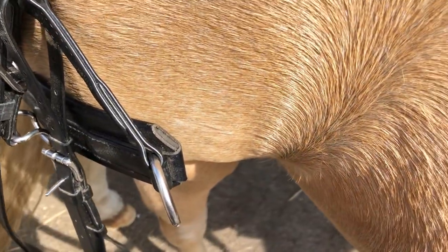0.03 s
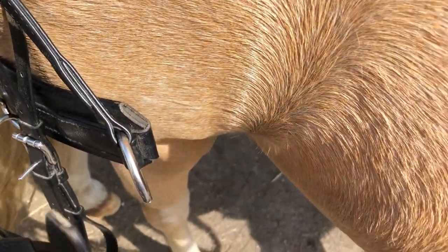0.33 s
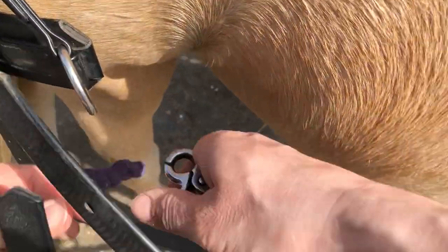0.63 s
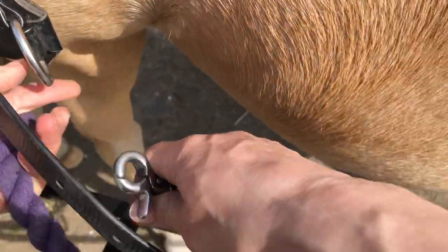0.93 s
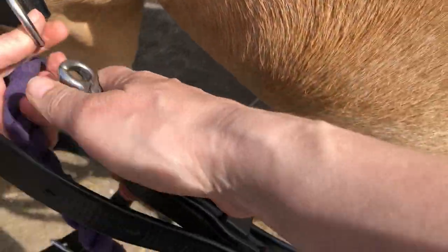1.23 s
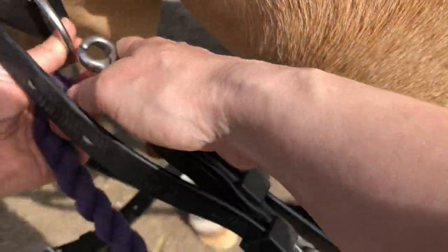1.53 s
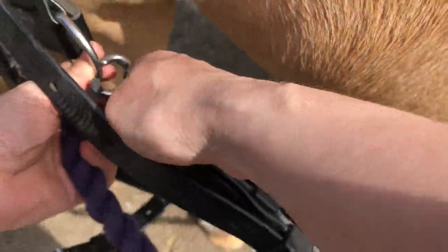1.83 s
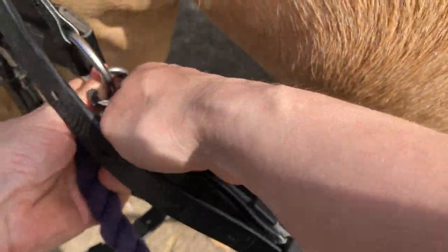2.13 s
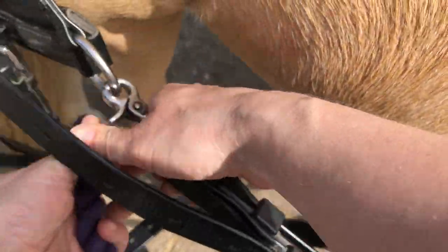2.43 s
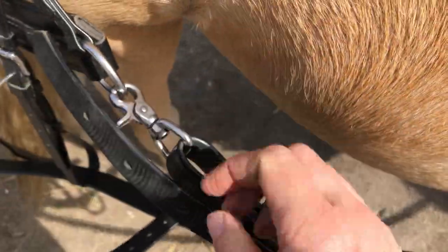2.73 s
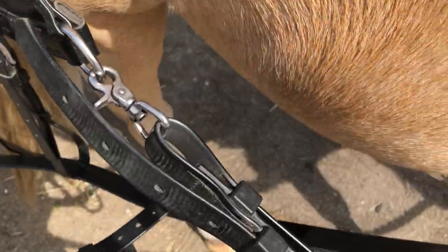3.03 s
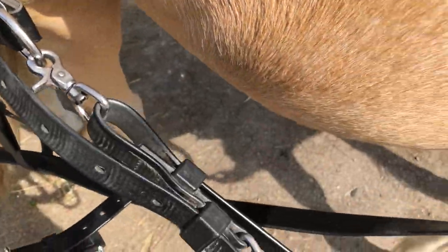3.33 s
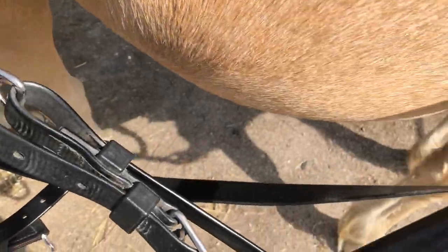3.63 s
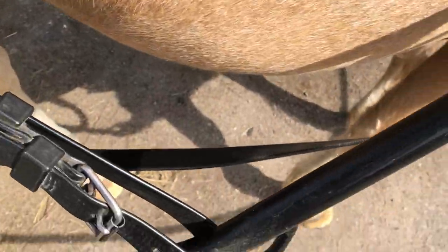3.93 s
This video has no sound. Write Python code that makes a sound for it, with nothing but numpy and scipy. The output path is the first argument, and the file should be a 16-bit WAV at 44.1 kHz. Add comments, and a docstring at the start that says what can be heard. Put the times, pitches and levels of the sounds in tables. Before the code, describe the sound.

Metal clicks of a hook being fastened to a harness, with rubbing, leather creak and birds.

```python
"""A snap hook is clipped to a harness ring beside a horse, outdoors, close to the microphone.
From the start, hands rub and bump the camera, a strap hisses and far birds chirp over a faint rumble.
The hook clicks, a nearer bird whistles, the ring jingles, and near 1 s grit scuffs once on the ground.
Then the tight leather strap creaks, slowing from a squeak to ticks. The bird whistles again,
the hook snaps sharply at 2.3 s, and a few small clicks, soft bumps and chirps end the scene."""
import sys
import numpy as np
from scipy import signal
from scipy.fft import rfft, irfft
from scipy.io import wavfile
from scipy.ndimage import uniform_filter1d

SR = 44100
rng = np.random.default_rng(int(sys.argv[2]) if len(sys.argv) > 2 else 0)


def dump_mix(stems):
    """Bounce the given channels to the path in sys.argv[1] as a 16-bit WAV at rate SR."""
    frames = np.atleast_2d(stems).T  # one column per channel
    limited = np.clip(frames, -1, 1)  # hard clip at full scale
    pcm = np.round(limited * 32767).astype(np.int16)
    wavfile.write(sys.argv[1], SR, pcm)


N = 176400
T = np.arange(N) / SR
YARD_T60 = 0.055  # a t60 is a fade time: the seconds a sound takes to drop by 60 dB


def amp(db):
    """Turns decibels into a gain to multiply by."""
    return 10 ** (np.asarray(db) / 20)


def unit(x):
    """Scales a signal to an average power of 1."""
    return x / np.sqrt(np.mean(x ** 2) + 1e-20)


def read(colour, hz):
    """Looks up the level at hz in a colour: a list of (frequency in Hz, level in dB) points."""
    freqs, db = np.transpose(colour)
    return np.interp(np.log(hz + 1), np.log(freqs + 1), db)


def add(mix, start, sound):
    """Mixes a sound in at a start time in seconds."""
    part = mix[max(round(start * SR), 0):][:len(sound)]
    part += sound[:len(part)]


def noise(colour):
    """Steady noise with the given colour."""
    gains = amp(read(colour, np.fft.rfftfreq(N, 1 / SR)))
    return unit(irfft(rfft(rng.standard_normal(N)) * gains, N))


def impulse(colour, size=2048):
    """One sharp pulse with the given colour; it also serves as a filter."""
    log_gain = np.log(amp(read(colour, abs(np.fft.fftfreq(size, 1 / SR)))))
    spectrum = np.exp(signal.hilbert(log_gain).conj())  # packs the energy at the start
    return np.fft.ifft(spectrum).real[:size // 2]


def echo(x, t60):
    """Sound bounces around the yard and comes back as a fading blur."""
    t = T[:SR // 2]
    tail = rng.standard_normal(len(t)) * amp(-60 * t / t60) * (t > .003)
    return signal.fftconvolve(x, tail / np.linalg.norm(tail))[:N]


def mode(hz, db, t60, size=16000):
    """One fading tone of a struck object."""
    t = T[:size]
    return amp(db - 60 * t / max(t60, .001)) * np.sin(2 * np.pi * (hz * t + rng.random()))


def rumble():
    """The faint, steady rumble of the outdoors."""
    # Each row: frequency in Hz, relative level in dB.
    colour = [(15, -65), (25, -58), (184, -39.5), (211, 0.5), (299, -6), (342, -5), (437, -7.5),
              (812, -5.5), (881, -5.5), (1040, -9), (1510, -12), (1780, -13), (2330, -19), (4450, -23),
              (15800, -38)]
    return amp(-60) * noise(colour)


def rubbing():
    """A hand rubs on the camera and makes a dull noise."""
    # Each row: time in seconds, level in dB.
    levels = [(0, -33.5), (.18, -37), (.33, -44.5), (.38, -47.5), (.55, -48.5), (.9, -54.5), (1.05, -41.5),
              (1.2, -51.5), (1.32, -53.5), (1.55, -52), (1.85, -57), (2.3, -59.5), (2.48, -54),
              (2.68, -49.5), (2.95, -57.5), (3.62, -65.5), (3.74, -49), (4, -60.5)]
    # Each row: frequency in Hz, relative level in dB.
    colour = [(20, -39), (50, 6.5), (90, 2.5), (180, -2), (350, -11.5), (650, -21), (1100, -33),
              (3000, -54), (16000, -82)]
    return noise(colour) * amp(np.interp(T, *np.transpose(levels)))


def sliding():
    """The strap slides through the hand with a grainy hiss."""
    # Each row: time in seconds, level in dB.
    levels = [(0, -65), (.3, -66), (.5, -66.5), (.72, -60), (.85, -63.5), (1.15, -61.5), (1.3, -64.5),
              (1.75, -68), (2.3, -68.5), (2.6, -64), (2.7, -64.5), (2.79, -59.5), (2.88, -65.5),
              (2.95, -73.5), (3.12, -69), (3.22, -68.5), (3.29, -70), (3.37, -66.5), (3.47, -74.5),
              (3.88, -81), (3.93, -69), (4, -71)]
    # Each row: frequency in Hz, relative level in dB.
    colour = [(100, -26), (1500, 7.5), (3000, 0), (8000, -4.5), (12000, -6), (16000, -9)]
    grain = amp(2.8 * unit(uniform_filter1d(rng.standard_normal(N), size=130)))
    return grain * noise(colour) * amp(np.interp(T, *np.transpose(levels)))


def song(notes, echo_db):
    """A bird sings raspy, gliding notes, blurred by a fluttering echo."""
    out = np.zeros(N)
    flutter = noise([(20, 0), (539, 0), (1078, -20), (5000, -70)])
    scatter = unit(1 + amp(-3.5) * np.roll(flutter, N // 2))
    warble = .015 * unit(uniform_filter1d(rng.standard_normal(N), size=120))
    for start, length, start_hz, end_hz, db in notes:
        on = (T >= start) & (T < start + length)
        progress = (T[on] - start) / length
        hz = (start_hz + (end_hz - start_hz) * progress) * (1 + warble[on])
        swell = amp(db - 2.3) * np.sqrt(abs(np.sin(np.pi * progress)))
        rasp = 1 + amp(-9) * flutter[on]
        out[on] += swell * rasp * np.sin(2 * np.pi * np.cumsum(hz) / SR)
    return out + amp(echo_db) * echo(out, t60=.49) * scatter


def birds():
    """A far bird chirps; a nearer one, with less echo, gives two falling whistles."""
    # Each row: start and length in seconds, first and last pitch in Hz, relative level in dB.
    chirps = [(0, .05, 4600, 4850, -53), (.012, .043, 2550, 3800, -56), (.051, .007, 4500, 3600, -42.5),
              (.058, .018, 3400, 2600, -46), (1.164, .02, 3400, 4150, -54), (1.173, .013, 4350, 4320, -48),
              (1.19, .012, 3950, 3820, -49), (1.198, .01, 4800, 4350, -48), (1.207, .018, 2850, 3380, -51),
              (1.72, .024, 4380, 4080, -48.5), (1.746, .011, 4300, 4600, -47),
              (1.758, .02, 3000, 3300, -53), (1.768, .015, 3650, 3450, -48), (1.787, .016, 3250, 3080, -53),
              (2.524, .013, 4520, 5000, -46), (2.537, .014, 5000, 4900, -47), (2.538, .02, 5350, 5500, -53),
              (2.547, .008, 4900, 3450, -47), (2.556, .016, 3650, 3720, -54),
              (2.594, .014, 3600, 3760, -46.5), (2.61, .026, 3150, 2950, -53.5),
              (2.998, .03, 3950, 3830, -62.5), (3.059, .048, 3840, 3760, -55.5),
              (3.165, .047, 4100, 4760, -64), (3.216, .02, 4900, 4240, -57), (3.256, .025, 3660, 4940, -60),
              (3.296, .034, 3440, 3460, -57.5)]
    whistles = [(.355, .082, 3950, 2450, -48.5), (1.938, .067, 3600, 2740, -49.5)]
    return song(chirps, echo_db=.5) + song(whistles, echo_db=-7)


def knocks():
    """Hard knocks briefly ring the camera case; the hardest add a brighter tap."""
    # Each row: start in seconds, relative level in dB.
    blows = [(.009, -32), (.02, -28), (.0805, -27), (.141, -36), (.162, -36), (.178, -21.5), (.211, -30.5),
             (.2975, -31), (.321, -41), (1.043, -38), (1.081, -38), (1.128, -33)]
    out = np.zeros(N)
    hardest = max(db for start, db in blows)
    for start, db in blows:
        case = mode(680 * (1 + .04 * rng.standard_normal()), db - 2, t60=0.014)
        tap = mode(1610, -23.5 + 4.6 * (db - hardest), t60=0.0051)
        rise = 1 - np.exp(-(T[:len(case)] / 0.0011) ** 2)
        add(out, start, 2 * (case + tap) * rise)
    return out


def bumps():
    """Each soft bump on the camera is a few rough, low waves that sag in pitch."""
    # Each row: time of the peak in seconds, relative level in dB, pitch near the peak in Hz.
    thuds = [(.011, -26.5, 447), (.021, -27.5, 476), (.084, -23.5, 210), (.103, -23.5, 230),
             (.113, -30, 185.4), (0.125, -33, 171), (.145, -26.5, 236), (0.154, -28, 132.8),
             (.164, -28, 400), (0.1811, -17, 574), (0.195, -22.5, 153), (0.215, -27, 264),
             (0.241, -37, 119), (.268, -28, 330), (.301, -25.5, 264.7), (.311, -32, 278),
             (0.321, -28.5, 352), (0.342, -34, 171), (0.447, -33.5, 224), (.471, -37, 148),
             (0.492, -37, 166), (.52, -42, 134.7), (0.611, -36, 101.7), (.688, -41.5, 170),
             (.705, -35, 270), (.719, -39.5, 145), (.801, -35, 167), (0.829, -38.5, 121),
             (1.009, -34.5, 193), (1.043, -28.5, 207), (1.06, -37, 110), (1.084, -33.5, 282),
             (1.109, -31.5, 115), (1.131, -21.5, 316), (1.187, -38.5, 89), (1.285, -37.5, 111),
             (1.348, -38.5, 218), (1.404, -43, 103), (1.432, -40, 105.6), (1.473, -39, 108),
             (1.502, -36, 175), (1.54, -39.5, 142), (1.563, -36.5, 120), (1.646, -35.5, 86),
             (1.766, -44, 121), (2.035, -43, 128), (2.516, -25, 150), (2.545, -24, 172), (2.582, -29, 138),
             (2.643, -38.5, 107), (2.666, -29, 233), (2.671, -35.5, 325), (2.677, -26.5, 131),
             (2.702, -34, 119), (2.739, -31, 97.5), (2.829, -36.5, 158), (3.049, -48, 110),
             (3.354, -45.5, 83), (3.738, -30, 141), (3.745, -46, 328), (3.817, -33.5, 98.6),
             (3.943, -36.5, 128), (3.964, -39.5, 134)]
    # Roughness of the contact. Each row: frequency in Hz, relative level in dB.
    grain_colour = [(20, -4.5), (120, 2), (260, -0.5), (450, -16), (900, -51), (3000, -80)]
    out = np.zeros(N)
    grain = 1 + amp(-16.5) * noise(grain_colour)
    for peak_time, db, hz in thuds:
        rise_s = 1.366 / hz
        age = T[:SR // 8] / rise_s  # 1 at the peak
        pitch = hz * (1.604 / (age + 0.59)) ** 0.953
        swell = amp(db - 1) * (age * np.exp(1 - age)) ** 1.93
        roughness = np.roll(grain, -round(peak_time * SR))[:len(age)]
        wave = np.sin(2 * np.pi * (np.cumsum(pitch) / SR + rng.random()))
        add(out, peak_time - rise_s, swell * roughness * wave)
    return out


def clicks():
    """Metal strikes the hook while fingers damp it; where it is hit sets the colour."""
    # Each row: start in seconds, relative level in dB, four band levels in dB, fade time in seconds.
    hits = [(0.1025, -21.5, -39.5, -24.5, -26.5, -48, 0.015), (0.2877, -37, -49, -55, -52.5, -64, 0.012),
            (0.3343, -14, -39.5, -28.5, -31, -30, 0.012), (0.3947, -35, -47, -61, -62, -66, 0.032),
            (0.551, -41, -67, -35, -57.5, -67, 0.012), (0.6545, -25.5, -64, -30, -24, -46, 0.0091),
            (0.6903, -16.5, -40, -25.5, -33.5, -36.5, 0.033), (0.7123, -18.5, -54.5, -20, -29, -36, 0.0081),
            (0.7451, -24.5, -50, -37, -39, -42, 0.015), (0.8862, -26.5, -52, -46.5, -37, -44, 0.02),
            (0.9773, -25, -44, -25, -47, -77, 0.023), (1.049, -30, -41.5, -35, -39, -55, 0.013),
            (1.052, -25, -51, -36, -47, -50, 0.011), (1.1054, -32.5, -41.5, -43, -55, -64, 0.021),
            (1.1421, -34.5, -51, -47, -45, -67, 0.0075), (1.223, -34.5, -49, -41, -50, -55, 0.011),
            (1.2366, -35, -51, -53, -49, -61, 0.013), (1.6786, -38, -57, -51, -60, -66.5, 0.011),
            (1.7032, -40, -55, -47.5, -67, -73, 0.0126), (1.9339, -20, -44.5, -35, -35.5, -45, 0.0098),
            (2.296, -12.5, -55, -17.5, -41, -26, 0.008), (2.3824, -33.5, -51, -49, -59, -74, 0.0095),
            (2.409, -33, -51.5, -50, -62, -69, 0.0086), (2.443, -39, -56, -55, -69, -70.5, 0.007),
            (2.651, -29, -39, -46.5, -47, -49, 0.011)]
    # The four bands in Hz: knock, body, edge and sparkle.
    band_hz = [2330, 5720, 9140, 14500]
    # The hook's tones. Each row: pitch in Hz, relative level in dB.
    hook_tones = [(1400, 12), (2600, 9), (3850, -2.5), (4450, 7), (5050, 1), (5600, -6), (6100, -4),
                  (6650, -1.5), (7300, -12), (8650, 0), (10200, -0.5), (12200, -36.5), (13700, 0),
                  (15500, -2)]
    out, size = np.zeros(N), 3000
    t = T[:size]
    rise = np.minimum(t / 0.00079, 1)
    for start, level, *bands_db, t60 in hits:
        body = sum(mode(hz * (1 + .015 * rng.standard_normal()), db, t60, size) for hz, db in hook_tones)
        burst = rfft(rng.standard_normal(size) * amp(-60 * t / t60) * rise)
        flattened = irfft(burst / np.sqrt(abs(burst) + 1e-9), size)  # evens out the burst's colour
        crack = unit(flattened * np.exp(-t / t60))
        colour = [(400, bands_db[0] - 6.5)] + list(zip(band_hz, bands_db))
        click = signal.fftconvolve(unit(body) * rise + amp(8) * crack, impulse(colour))
        click *= np.sqrt(SR * 0.00015) / np.linalg.norm(click)  # same energy for every click
        add(out, start + .0007, amp(level) * click)
    return out


def pings():
    """Small metal fittings each give a brief tone when struck."""
    # Each row: start in seconds, pitch in Hz, level in dB, fade time in seconds.
    tones = [(0.1033, 9940, -22.5, 0.013), (.1072, 9500, -27.5, 0.0101), (.1035, 5700, -28.5, 0.014),
             (0.103, 15300, -27, .008), (.336, 9600, -34.5, 0.042), (.3355, 6610, -20, 0.0093),
             (0.335, 15750, -16, 0.0053), (0.6548, 11400, -35.5, .015), (.6557, 8900, -30, .007),
             (0.6905, 5480, -23, 0.012), (0.6905, 7250, -26.5, 0.026), (0.691, 13470, -24.5, .012),
             (.713, 7300, -27.5, .011), (0.714, 14140, -21.5, 0.0058), (0.8879, 13800, -32, .009),
             (.978, 4870, -24.5, 0.012), (.9785, 6900, -41, .05), (1.124, 13800, -49, 0.05),
             (1.143, 2560, -43, .02), (1.143, 5100, -43, .06), (1.225, 4170, -41, .03),
             (1.226, 2850, -42, .04), (2.297, 4970, -21, .01), (2.2973, 4430, -28.5, .011),
             (2.2973, 6440, -23.5, 0.011), (2.297, 8600, -24, .008), (2.2968, 15500, -21, .008)]
    out = np.zeros(N)
    for start, hz, db, t60 in tones:
        add(out, start, mode(hz, db, t60))
    return out


def jingles():
    """The struck ring chimes and its linked parts shimmer; fingers shorten and dull the sound."""
    # The free ring's tones. Each row: pitch in Hz, relative level in dB, fade time in seconds.
    ring_tones = [(570, -10, .33), (635, -8.5, .57), (1355, -5, .22), (1925, -7, .22), (2821, -5, .17),
                  (4200, -3, .12), (5046, -1.5, .15), (5600, 4.5, .12), (6025, -6, .16), (6756, -6, .22),
                  (7230, -1, .17), (7897, -1.5, .33), (8560, -3, .13), (8670, 0, .1), (9152, -9, .2),
                  (9580, 0, .15), (10400, -6, .1), (12090, -12, .14), (13867, -9, .14)]
    # Each row: start in seconds, relative level in dB, share of fade time, treble cut in dB per octave.
    blows = [(.691, -50, 1, 0), (.713, -49, .82, 0), (.7465, -50, .6, 1), (.978, -51, .7, 16),
             (1.143, -56, .2, 4), (1.226, -53, .35, 6), (1.238, -58, .25, 4)]
    # Each row: frequency in Hz, relative level in dB.
    shimmer_colour = [(400, -4), (1500, -3), (3000, -6), (5500, -8), (8000, -7), (12000, -10), (16000, -35)]
    out = np.zeros(N)
    for start, level, share, dull_db in blows:
        ring = sum(mode(hz, db + 2.5 * rng.standard_normal(), t60 * share) for hz, db, t60 in ring_tones)
        t = T[:len(ring)]
        shimmer = noise(shimmer_colour)[:len(t)] * amp(-.5 - 60 * t / (0.21 * share))
        fingers = impulse([(5500, 0), (22000, -2 * dull_db)])
        add(out, start, amp(level) * signal.fftconvolve(ring + shimmer, fingers))
    return out


def scuff():
    """Grit crunches underfoot in a quick cluster of noise bursts."""
    # Each row: start in seconds, level in dB, seconds to fade to about a third.
    bursts = [(.925, -45, 0.011), (0.9323, -37, 0.0063), (0.9429, -38, 0.0021), (0.945, -49.5, 0.031)]
    # Each row: frequency in Hz, relative level in dB.
    colour = [(100, 4), (600, -0.5), (1000, -6), (1550, 5.5), (2100, 4), (2800, -14), (6000, -9.5),
              (16000, -24)]
    loudness = np.zeros(N)
    for start, db, fade_s in bursts:
        add(loudness, start, amp(db) * np.exp(-T[:SR // 4] / fade_s))
    return loudness * noise(colour)


def clacks():
    """Metal pressed against metal gives one hard pulse with no ring after it."""
    # Each row: start in seconds, peak in dB, centre in Hz, drop above the centre in dB per octave.
    hits = [(.9438, -27.5, 1700, 11), (1.0497, -21, 6000, 4), (1.4296, -36, 4300, 18), (2.65, -27, 2900, 8),
            (2.652, -29, 1450, 6)]
    out = np.zeros(N)
    octaves = np.linspace(-5, 4, 19)
    for start, peak_db, hz, fall_db in hits:
        hill_db = np.minimum(9 * octaves, -fall_db * octaves) + 5 * (octaves == 0)
        pulse = impulse(np.c_[hz * 2 ** octaves, hill_db])
        add(out, start, amp(peak_db) * pulse / abs(pulse).max())
    return out


def slips(curve, colour):
    """Each slip of the leather is one tick; unevenness scatters their spacing, force and colour."""
    times, *controls = np.transpose(curve)
    hz, db = np.transpose([(400, colour[0][1] - 12)] + list(colour))
    out, now, taps = np.zeros(N), times[0], np.arange(-8, 9)
    for gap, force, *tint in rng.standard_normal((700, 2 + len(hz))):
        if now < times[-1]:
            rate, level, uneven = (np.interp(now, times, control) for control in controls)
            spread_db = 7 * uneven
            tick = impulse(np.c_[hz, db + spread_db * np.array(tint)], size=512)
            offset = now * SR - round(now * SR)  # placing ticks between samples keeps the squeak clean
            tick = np.convolve(tick / abs(tick).max(), np.sinc(taps - offset) * np.hanning(len(taps)))
            add(out, now, amp(level + spread_db * force) * tick)
            now += np.exp(uneven * gap) / rate
    return out


def creak():
    """Tight leather sticks and slips, slowing from a squeak through a rasp to separate ticks."""
    # Each row: time in seconds, slips per second, relative level in dB, unevenness from 0 to 1.
    squeak = [(1.345, 1590, -62, .01), (1.371, 1560, -49.5, .035), (1.381, 1390, -46, .06),
              (1.396, 1230, -43, .06), (1.412, 1560, -41, .15), (1.445, 1560, -41, .16),
              (1.48, 1540, -43, .22), (1.508, 1250, -45, .25), (1.522, 400, -40, .3)]
    ticks = [(1.524, 165, -33.5, .05), (1.555, 120, -34, .1), (1.575, 140, -35, .2), (1.6, 134, -35, .15),
             (1.645, 140, -35, .17), (1.668, 90, -35.5, .1)]
    # Each row: frequency in Hz, relative level in dB.
    squeak_colour = [(880, -38), (1500, -11), (2060, -11), (2360, -3.5), (3090, -4), (3600, -11), (4540, 2),
                     (5780, -6.5), (6300, -2.5), (7870, -16), (8830, -10), (11600, -11.5), (13500, -18),
                     (15000, -41)]
    tick_colour = [(880, -39), (1500, -14.5), (1760, -4), (2120, -14), (2380, -8), (3600, -10), (4840, 2),
                   (5780, -7.5), (6770, -6), (7330, -20.5), (8750, -6), (11900, -10.5), (13000, -22),
                   (14200, -15), (15800, -21)]
    out = amp(.5) * slips(squeak, squeak_colour) + amp(1.5) * slips(ticks, tick_colour)
    return out + amp(-24) * echo(out, YARD_T60)


def scene():
    """Mixes all the sounds into one channel, with a short yard echo on the metal."""
    handling = rubbing() + sliding() + knocks() + bumps()
    metal = clicks() + pings() + jingles() + clacks()
    metal += amp(-23) * echo(metal, YARD_T60)
    return (rumble() + handling + birds() + metal + scuff() + creak())[None]


def record(dry):
    """Cuts off the highest treble, above 16300 Hz."""
    lowpass = signal.firwin(255, 16300, window=("kaiser", 9), fs=SR)
    return signal.oaconvolve(dry, lowpass[None], "same")


dry = scene()
out = record(dry)
dump_mix(out)
```